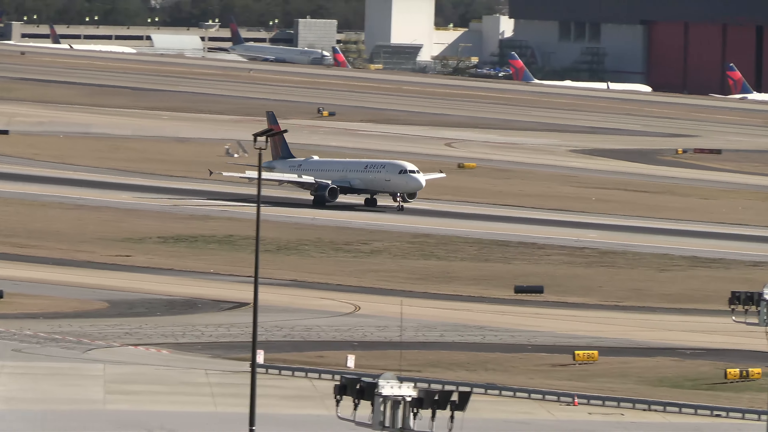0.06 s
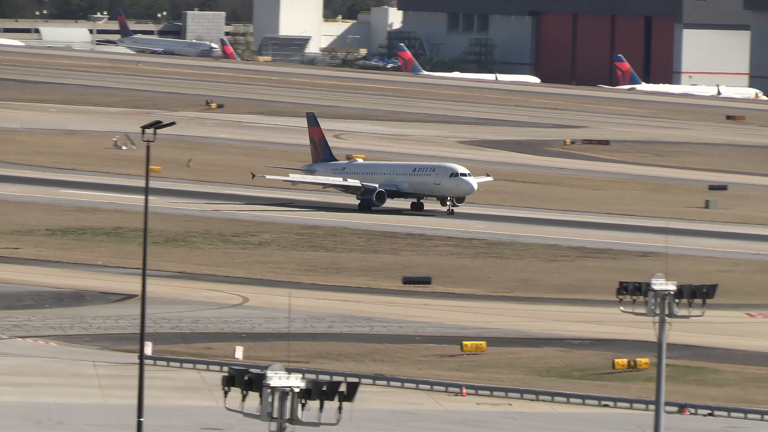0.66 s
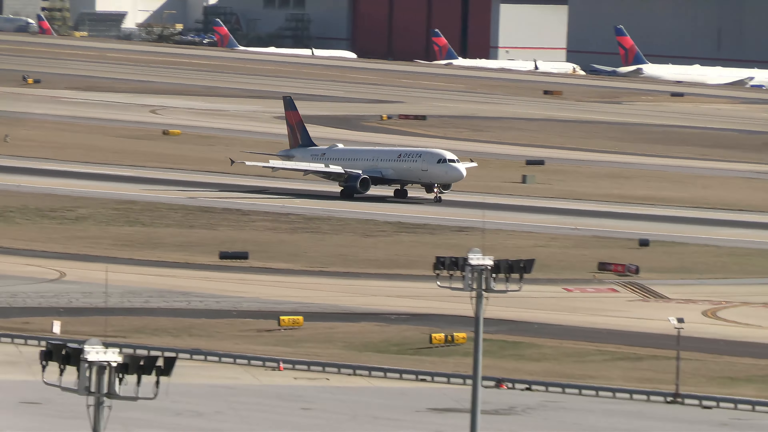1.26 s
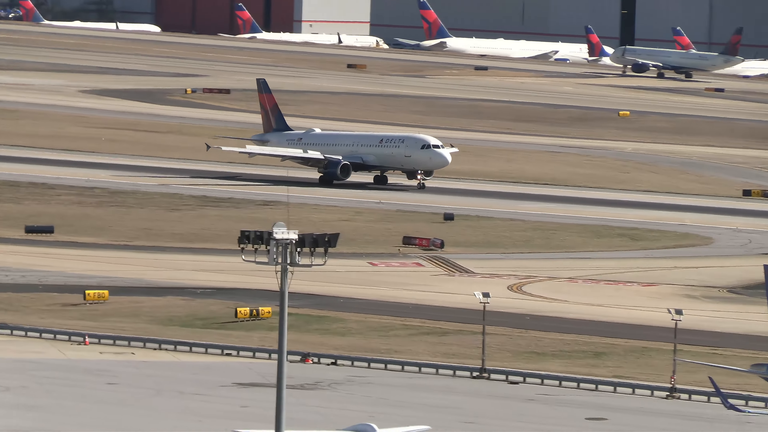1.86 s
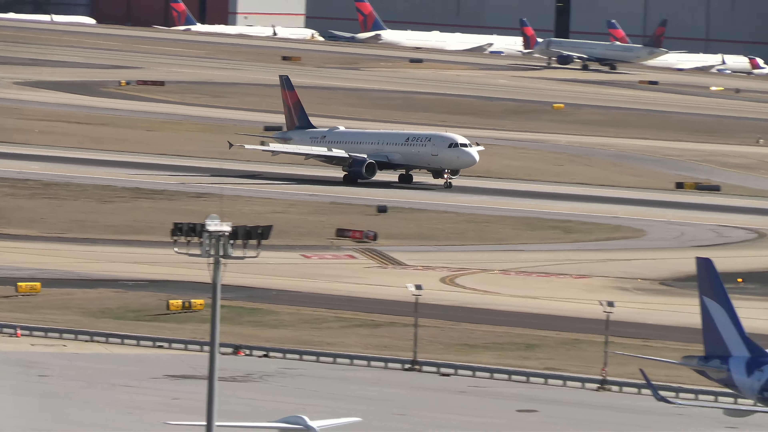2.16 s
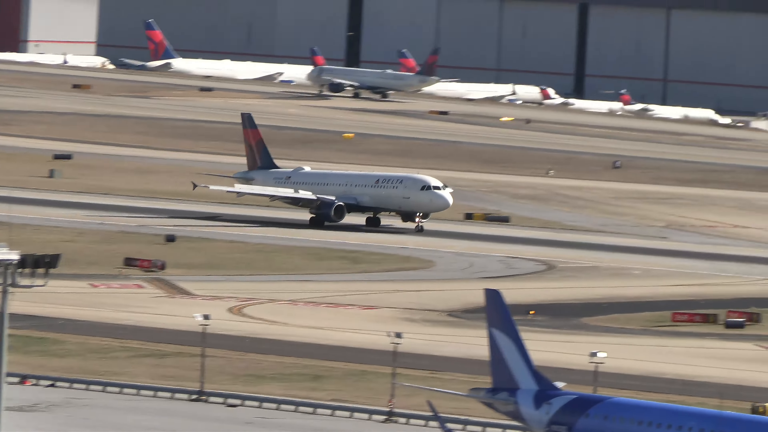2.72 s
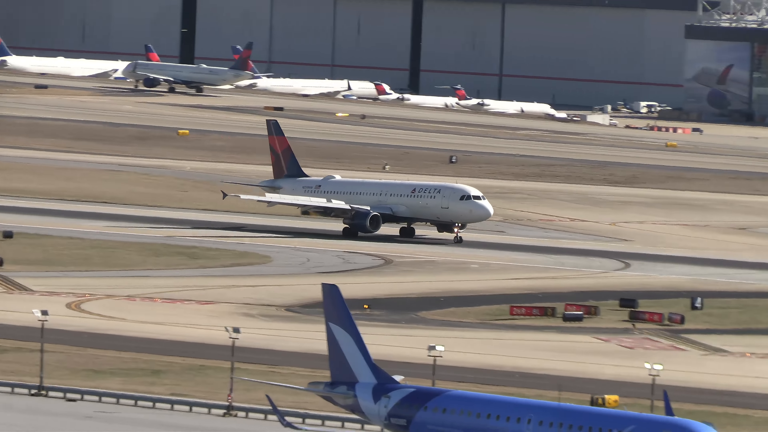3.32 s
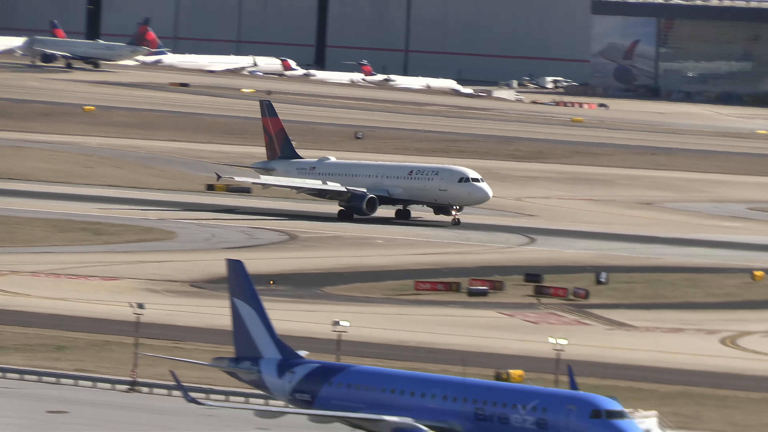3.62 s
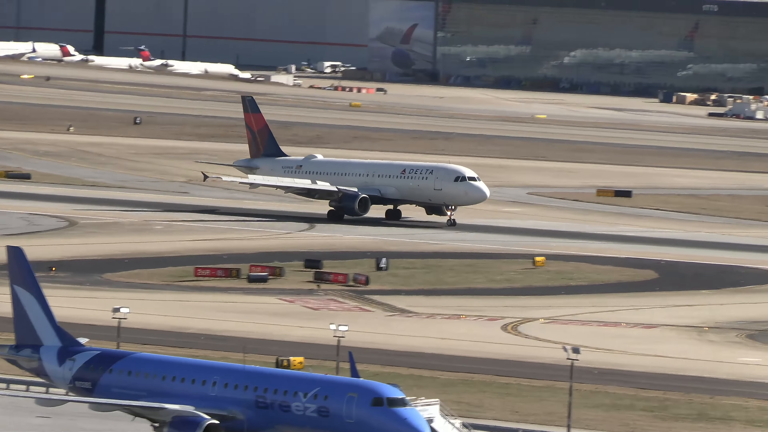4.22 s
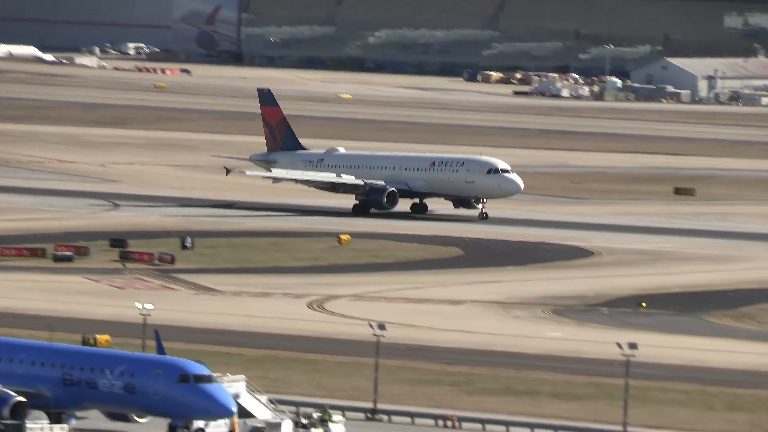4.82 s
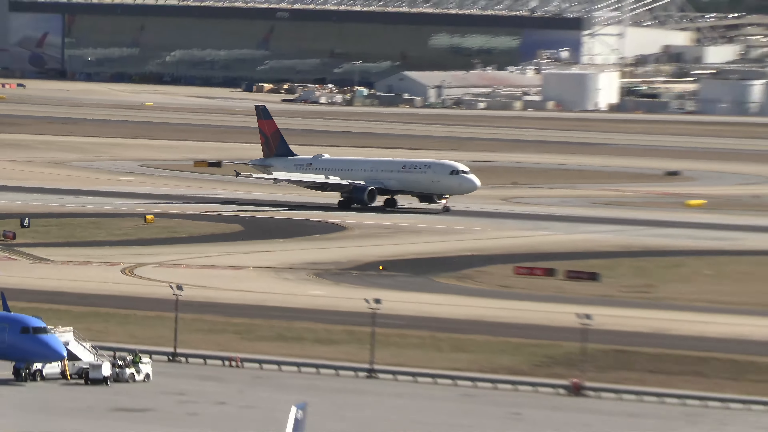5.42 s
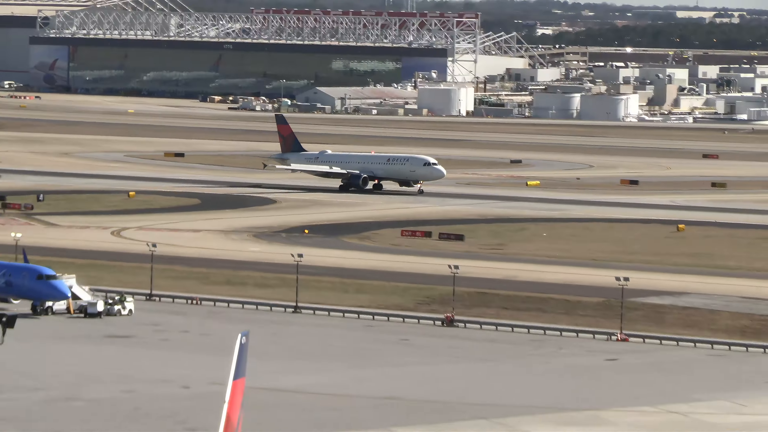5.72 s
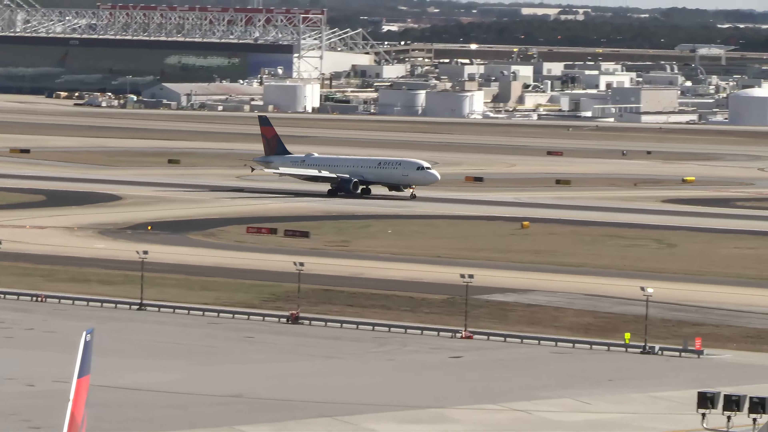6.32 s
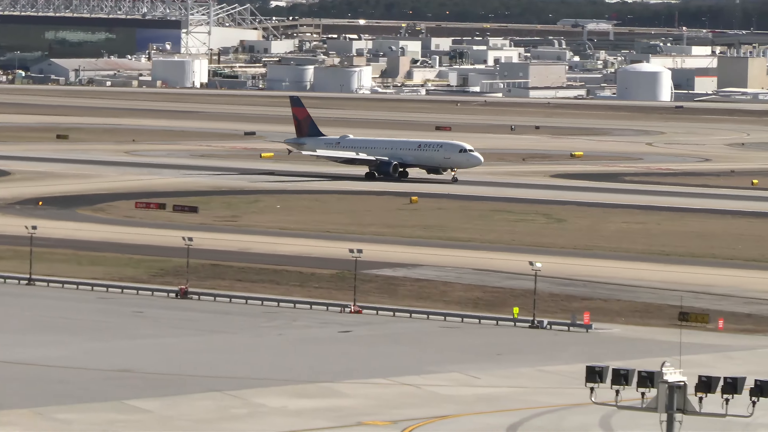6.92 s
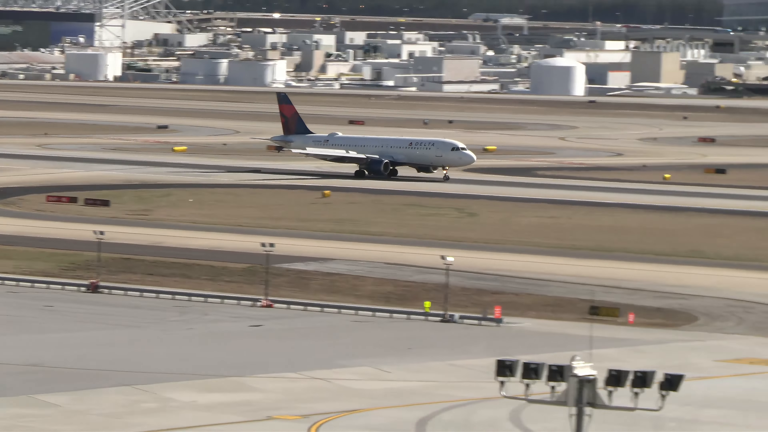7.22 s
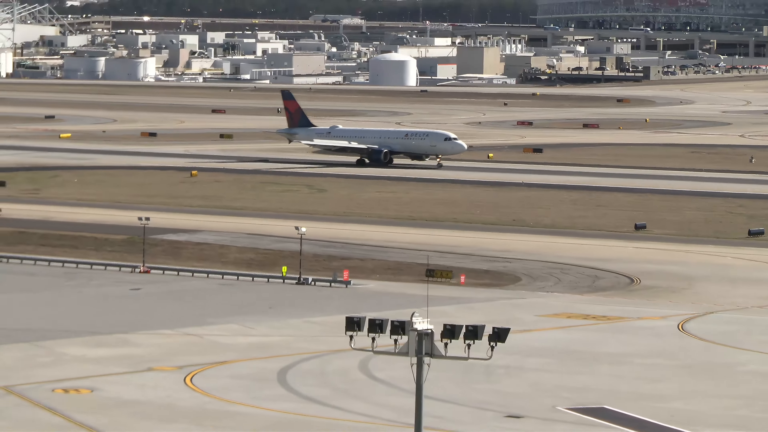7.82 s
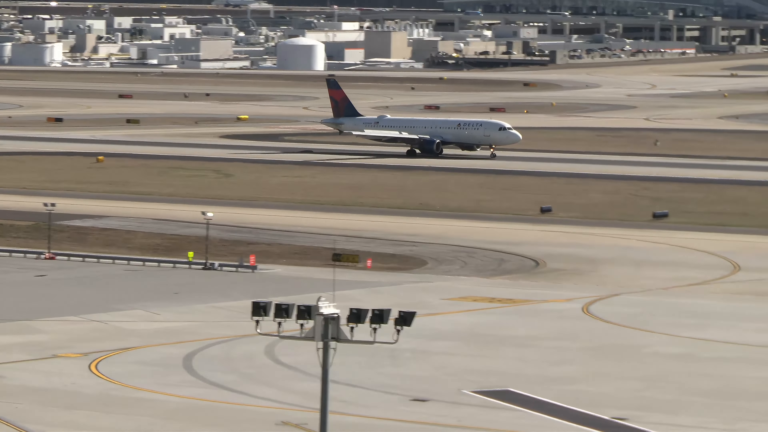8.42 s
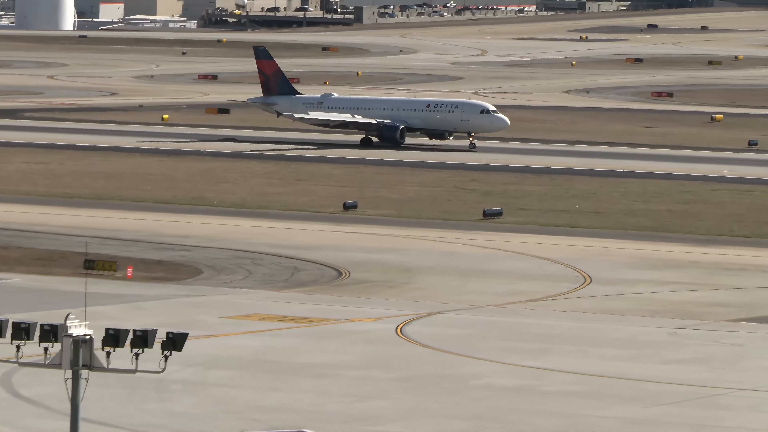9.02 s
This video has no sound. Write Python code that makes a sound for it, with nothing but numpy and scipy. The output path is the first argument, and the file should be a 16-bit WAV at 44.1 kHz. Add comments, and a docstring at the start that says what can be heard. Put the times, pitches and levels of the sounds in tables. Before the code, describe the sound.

Jet roar from an airliner on a far runway swells in uneven waves, with a low boom, hollow howls and a thin wavering whine.

```python
"""An airliner's jet roar, heard from a microphone pair far from the runway as the plane rolls out.
The exhaust noise swells and grows harsher in surges; a low boom, a drone and hollow howls stand out.
Surfaces near the microphones add short echoes whose delays slide as the plane passes: a slow phasing.
A thin fan whine spools up and sinks, over a faint hiss. At first boom and drone carry a pitched hum;
late on come a faint, low buffeting and one tiny tick of recorder distortion at a peak of the roar."""
import sys
import numpy as np
from scipy import signal
from scipy.fft import rfft, irfft, next_fast_len
from scipy.io import wavfile
from scipy.ndimage import uniform_filter1d, minimum_filter1d

SR = 44100
rng = np.random.default_rng(int(sys.argv[2]) if len(sys.argv) > 2 else 0)


def int16_out(signal):
    """Quantize to a 16-bit WAV file."""
    q = np.round(np.clip(np.atleast_2d(signal).T, -1, 1) * 32767)
    wavfile.write(sys.argv[1], SR, q.astype(np.int16))


N = 403956
FRAME, HOP = 4096, 1024
TIME = np.arange(N) / SR
FRAME_TIME = np.arange(N // HOP + 3)[:, None] * HOP / SR
BINS = np.fft.rfftfreq(FRAME, 1 / SR)


# jet mixing noise, before each band is brought to its level: frequency_hz, relative_db
JET_SPECTRUM = [(25, -51.5), (42, -41), (60, -23.5), (70, -27.5), (88, -11.5), (104, -12.5), (165, -4.5),
                (245, -5), (280, -6.5), (320, -4.5), (400, -4), (600, -6), (740, -13), (930, -16),
                (1070, -19.5), (1250, -19.5), (1600, -24), (2000, -28), (2200, -31), (2550, -36),
                (3000, -44.5), (4100, -62.5), (5500, -92)]
# the air takes less treble as the plane draws nearer: time_s, loss_db_per_khz
AIR_ABSORPTION = [(0, 6.5), (1.5, 7.5), (3, 2.5), (5, 2), (9.16, 2.5)]

def jet_roar():
    """Exhaust noise from the far runway, coloured by the air and by echoes, swelling in five bands."""
    air_db = -at_time(AIR_ABSORPTION, FRAME_TIME)[0] * np.minimum(BINS / 1000, 5)
    spectrum = amp(at_hz(JET_SPECTRUM, BINS) + air_db)
    noise = noise_at_microphones(spectrum * nearby_echoes() * roar_resonances() * turbulence())
    bands = split(noise, edges_hz=(110, 260, 800, 2600))
    windows = (12000, 7000, 7000, 9000, 9000)  # samples
    return sum(at_level(band, db, window) for band, db, window in zip(bands, roar_levels(), windows))


# the level between surges as the plane nears: time_s, rumble_db, roar_db, harsh_db, sizzle_db
APPROACH = [(0.0, -31, -29.5, -33.5, -60), (2.4, -26.5, -25.5, -31.5, -56.5), (4.4, -25, -20.5, -28, -56),
            (7.0, -20.5, -20, -27, -47.5), (9.16, -16.5, -18.0, -25.5, -43)]
# surges carried over by the air: crest_s, length_s, roar_db, harsh_db, sizzle_db
SURGES = [(1.55, 0.59, 1, 3, 1), (1.98, 0.44, 2, 3.5, 1), (2.751, 0.52, 5.5, 2.5, -0.5),
          (3.4, 0.58, 0.6, 3.5, 3), (4.01, 0.44, 2, 6.5, 6), (4.785, 0.38, 3.5, 4.5, 6.5),
          (5.22, 0.57, 2.5, 3.5, 2.5), (5.803, 0.51, 4.5, 1.5, -1.5), (6.442, 0.75, 3, 4, 2),
          (7.504, 0.54, 6.5, 5.5, 3), (8.35, 0.29, 3, 0, 1.5), (8.82, 0.093, 2.2, 2, -1)]
# brief gusts churning on top of the surges: crest_s, roar_db, treble_db
GUSTS = [(2.1, 2.5, -1.5), (2.32, 5, -0.5), (2.529, 1, 0), (2.69, 3, 0.5), (2.81, 2, 2), (3.72, 2, 1.5),
         (3.93, 1.5, 1.5), (4.12, 3, -1.5), (4.47, 2, 0.5), (4.72, 0, 0.5), (5.08, -0.5, 2),
         (5.16, 1.5, 1.5), (5.28, 1, 2), (5.36, 4, -0.5), (5.48, 3.5, -0.5), (5.83, 2.5, 2.5), (5.89, 0, 2),
         (6.33, 1, 0.5), (6.51, 0.5, 1), (6.57, 2.5, 0.5), (7.29, 3, -0.5), (7.35, -0.5, 1.8),
         (7.52, -0.5, 6), (7.64, 7.5, 6)]
# lulls, where part of the sound briefly sinks: deepest_s, length_s, rumble_db, roar_db, treble_db
LULLS = [(3.12, .2, -2.5, 0, -1), (4.31, 0.2, 0, -2.5, 0.5), (4.83, 0.077, 0, -3, -3.5),
         (5.55, 0.13, -0.5, 0, -1.5), (6.08, 0.056, 3.5, -5, -1), (6.47, 0.043, 4.5, -4, 0),
         (7.1, 0.19, -1.5, -2.5, 1), (7.8, 0.12, -1.5, 0.5, -1.5)]
# rolls of the rumble, apart from the surges: crest_s, length_s, lift_db
RUMBLE_ROLLS = [(2.07, 0.18, 4.5), (2.38, 0.19, 5.5), (2.89, 0.5, 7.5), (3.4, 0.46, 4), (3.74, 0.085, 8.5),
                (4.0, 0.31, 4), (4.59, 0.52, 5.5), (5.36, 0.85, 4), (6.85, 0.302, 3), (7.53, 0.91, 3),
                (8.14, 0.1, 6.5), (8.4, 0.21, 6.5), (8.91, 0.32, 2)]
# heaves of the deep bass: crest_s, length_s, lift_db
BASS_HEAVES = [(2.35, 0.5, 5.5), (4.35, 0.25, 4), (6.33, 0.2, 6), (6.85, 0.6, 4)]

def roar_levels(gust_s=0.054, deep_db=-37.5):
    """The dB reaching the microphones in the deep, rumble, roar, harsh and sizzle bands."""
    rumble_db, roar_db, harsh_db, sizzle_db = at_time(APPROACH, TIME)
    roar_surge, harsh_surge, sizzle_surge = lifts(SURGES)
    roar_gust, treble_gust = lifts([(crest_s, gust_s, *lift_db) for crest_s, *lift_db in GUSTS])
    rumble_lull, roar_lull, treble_lull = lifts(LULLS)
    shimmer_db = .5 * wander(rate_hz=22)  # the treble shimmers on its way through the air
    flutter_db = shimmer_db + treble_gust + treble_lull
    sway_db = 1.3 * wander(rate_hz=6.1)
    return (deep_db + lifts(BASS_HEAVES)[0] + sway_db,
            rumble_db + lifts(RUMBLE_ROLLS)[0] + rumble_lull,
            roar_db + roar_surge + roar_gust + roar_lull,
            harsh_db + harsh_surge + flutter_db,
            sizzle_db + sizzle_surge + flutter_db)


# moving peaks and dips in the roar, from low to high: time_s, pitch_hz, lift_db
BOOM = [(0, 151.4, 9), (1.8, 156.1, 7), (2.9, 159.9, 6.5), (4, 162, 2), (5.0, 184.5, 2), (5.6, 213, 12),
        (6.4, 190, 7.5), (7.4, 184.2, 6.5), (8.5, 178.7, 7.5), (9.16, 181, 5)]  # the centre of the rumble
TROUGH = [(0, 265, 1.5), (1.9, 255, -7), (2.8, 225, 0), (3.5, 235, 3.5), (4.3, 262, -0.5), (5.5, 266, 9.5),
          (6.5, 258, 0.5), (7.6, 250, -2), (9.16, 275, 1)]  # a dip near 260 Hz that turns into a peak around 5.5 s
DRONE = [(0, 339, 8), (.9, 337.5, 0.5), (1.4, 321.5, 10.5), (2.1, 335, 6.5), (2.9, 322.6, 10),
         (3.3, 311.5, 3.5), (4.4, 336, 0.5), (5, 431, 4), (6.3, 393.5, 6), (7.3, 361, 7.5), (9.16, 351, 1)]  # about an octave above the boom
LOW_HOWL = [(0, 435, -3), (2.7, 444, 5), (3.5, 441, 1), (4.6, 441, 9.5), (5.2, 508, 8), (6.5, 496, 4),
            (7.6, 494, 7), (8.1, 483, 1), (9.16, 443, -0.5)]
MIDDLE_HOWL = [(0, 542, -1), (2.8, 540, 6), (3.6, 527, 2), (4.1, 582, 5.5), (5.2, 650, 0.5),
               (6.5, 659, 4.5), (7.6, 623, 5.5), (8.1, 703, 3.5), (9.16, 721, 8.5)]
LOW_GAP = [(0, 627, 1), (1.7, 680, -0.5), (2.8, 723, -1), (4, 702, -0.5), (5.5, 736, -1), (6.6, 764, -2.5),
           (7.5, 780, -2), (9.16, 830, -1.5)]  # probably cut by the ground reflection
HIGH_HOWL = [(0, 755, -1.5), (1.8, 860, -1.5), (2.8, 875, 1.5), (3.6, 800, 5), (4.4, 842, 2.5),
             (5, 952, 5.5), (5.8, 880, -1.5), (6.5, 869, 6.5), (7.5, 930, 2), (9.16, 923, -3)]
THIN_HOWL = [(0, 1120, 3.5), (2, 1147, -1.5), (4.1, 1175, 7.5), (5, 1193, 0.5), (5.9, 1174, 7),
             (6.6, 1160, 1), (7.6, 1110, 1), (9.16, 1040, 2.5)]
HIGH_GAP = [(0, 1410, -2), (2.8, 1300, -0.5), (4.8, 1200, -2.5), (5.6, 1290, -0.5), (6.6, 1448, -5.5),
            (7.5, 1420, -1.5), (9.16, 1336, -0.5)]
BITE = [(0, 1810, -2), (1.5, 1800, -1), (1.9, 1800, -0.5), (2.75, 1740, 3.5), (3.1, 1800, -0.5),
        (5.1, 1770, 1.5), (7.45, 1700, 0.5), (7.75, 1700, -3), (8.4, 1700, 2), (9.16, 1720, -1.5)]  # the broad top of the roar

def roar_resonances():
    """Gain that makes boom, drone and hollow howls stand out, with gaps between them."""
    lows = resonance(BOOM, width_hz=25) * resonance(TROUGH, width_hz=17) * resonance(DRONE, width_hz=29)
    howls = resonance(LOW_HOWL, width_hz=41) * resonance(MIDDLE_HOWL, width_hz=42)
    upper_howls = resonance(HIGH_HOWL, width_hz=44) * resonance(THIN_HOWL, width_hz=55)
    gaps = resonance(LOW_GAP, width_hz=65) * resonance(HIGH_GAP, width_hz=80)
    return lows * howls * upper_howls * gaps * resonance(BITE, width_hz=700)


# reflections off three surfaces close to the microphones: time_s, delay_ms, strength_ratio
SHORT_ECHO = [(0, 2.57, 0.19), (2, 2.55, 0.06), (4, 2.09, 0.5), (5.5, 2, 0.4), (7.5, 1.75, 0.35),
              (9.16, 1.49, 0.48)]
MIDDLE_ECHO = [(0, 5.6, 0.088), (2, 6.2, 0.12), (4, 5.0, 0.11), (5.5, 5.86, 0.12), (7.5, 6.4, 0.4),
               (9.16, 6.73, 0.66)]
LONG_ECHO = [(0, 10.4, 0.015), (4, 6.8, 0.025), (5.5, 7.4, 0.25), (7.5, 8.05, 0.36), (9.16, 8.95, 0.33)]

def nearby_echoes():
    """Comb gain of the direct sound plus sliding echoes; each surface returns less of the treble."""
    response = 1
    for rows, dull_hz in ((SHORT_ECHO, 1110), (MIDDLE_ECHO, 746), (LONG_ECHO, 1150)):
        delay_ms, strength = at_time(rows, FRAME_TIME)
        delayed = np.exp(-2j * np.pi * BINS * delay_ms / 1000)
        response = response + strength * delayed / (1 + (BINS / dull_hz) ** 2)
    return abs(response)


def turbulence(depth_db=2.0):
    """Moving air between runway and microphones focuses and scatters patches of the spectrum."""
    patches = rng.standard_normal((len(FRAME_TIME), len(BINS)))
    patches = uniform_filter1d(patches, size=14, axis=0)
    patches = uniform_filter1d(patches, size=3, axis=1)
    return amp(depth_db * unit(patches))


# the fan's blade tone idles, spools up, then sinks with the Doppler shift: time_s, pitch_hz
BLADE_TONE = [(0, 2060), (.9, 2025), (1.5, 1945), (2.05, 1980), (2.3, 2096), (2.85, 2505), (3.1, 2527),
              (3.9, 2480), (4.8, 2497), (5.8, 2458), (6.5, 2404), (7.85, 2430), (8.2, 2392), (9.16, 2405)]
# the air focuses the whine into brief flares: crest_s, length_s, lift_db
WHINE_FLARES = [(2.42, .3, 3), (3.05, .3, 1), (3.38, 0.13, 3), (3.94, 0.24, 7), (4.43, .16, 4),
                (5.08, .16, 8), (5.82, .13, 9), (6.4, 0.24, 2), (7.27, 0.28, 5), (7.9, 0.3, 8.5),
                (8.22, .3, 5), (8.6, 0.47, 6.5)]

def fan_whine(base_db=-58, growth_db_per_s=1.0, waver_hz=8, fading_db=2.5, swing_db=1.5, lean_db=3.0):
    """The blade tones of two distant engines; the air blurs them and makes them fade in and out."""
    pitch_hz = at_time(BLADE_TONE, TIME)[0]
    engines = []
    for _ in range(2):
        cycles = np.cumsum(pitch_hz + waver_hz * wander(rate_hz=38)) / SR
        engines.append(np.sin(2 * np.pi * cycles) * amp(fading_db * wander(rate_hz=38)))
    left = (engines[0] + engines[1]) * amp(lean_db)
    right = (engines[0] + 0.45 * engines[1]) * amp(-lean_db)
    surge_db = 0.96 * lifts(SURGES)[1]  # rides with the roar's harsh band
    level_db = base_db + growth_db_per_s * TIME + surge_db + lifts(WHINE_FLARES)[0]
    return at_level(np.array([left, right]), level_db + swing_db * wander(rate_hz=2.7))


def hum(wobble_hz=4.48, fading_db=3, drone_db=-7, end_s=3.15, fade_s=.08):
    """The pitched cores of boom and drone; they roll with the rumble and fade as the roar fills out."""
    tones = []
    for rows in (BOOM, DRONE):
        cycles = np.cumsum(at_time(rows, TIME)[0] + wobble_hz * wander(rate_hz=16)) / SR
        tones.append(unit(np.sin(2 * np.pi * cycles) * amp(fading_db * wander(rate_hz=16))))
    boom, drone = tones
    level_db = at_time(APPROACH, TIME)[0] + lifts(RUMBLE_ROLLS)[0] - 6.5  # just under the rumble
    fade = .5 - .5 * np.tanh((TIME - end_s) / fade_s)
    return (boom + amp(drone_db) * drone) * amp(level_db) * fade


# thin background hiss: frequency_hz, relative_db
HISS_SPECTRUM = [(1500, -3), (3000, 8.5), (3600, 0), (4500, -2.5), (5500, -7), (8000, -12.5),
                 (11000, -16.5), (14000, -26.5)]
# a soft crest drifting through it: time_s, pitch_hz, lift_db
HISS_CREST = [(0, 4200, 2), (0.8, 4550, 3.5), (1.3, 4070, 1), (2.6, 4300, -2), (3.6, 5300, 2.5),
              (9.16, 5240, 3)]

def hiss(top_db=-66.5, hold_s=1.3, fade_db_per_s=2.5, dulling_db_per_khz_s=0.6):
    """A faint hiss behind the roar; it holds, then recedes and dulls, and dips under each surge."""
    receding_s = np.maximum(FRAME_TIME - hold_s, 0)
    dull_db = -dulling_db_per_khz_s * receding_s * np.maximum(BINS / 1000 - 6, 0)  # above 6 kHz
    spectrum = amp(at_hz(HISS_SPECTRUM, BINS) + dull_db)
    noise = noise_at_microphones(spectrum * resonance(HISS_CREST, width_hz=600))
    top = split(noise, edges_hz=(4400,))[1]  # this band sets the level
    dip_db = 0.47 * lifts(SURGES)[0]
    level_db = top_db - fade_db_per_s * np.maximum(TIME - hold_s, 0) - dip_db
    return noise / top.mean(0).std() * amp(level_db)


def buffet(level_db=-44):
    """A brief, faint buffeting far below the rumble, the same in both microphones."""
    return wander(rate_hz=49) * amp(level_db) * swell(TIME, crest_s=7.3, length_s=.9)


def tick(start_s=8.443, level_db=-59, decay_s=0.0045, pitch_hz=6300, width_hz=1500):
    """One tiny, bright tick of recorder distortion, placed at a peak of the roar."""
    hz = np.fft.rfftfreq(N, 1 / SR)
    band = np.exp(-((hz - pitch_hz) / width_hz) ** 2 / 2)
    noise = unit(irfft(rfft(rng.standard_normal(N)) * band, N))
    age = TIME - start_s
    return noise * amp(level_db) * (age > 0) * np.exp(-abs(age) / decay_s)


# how alike the two microphones sound: frequency_hz, coherence_ratio
MIC_COHERENCE = [(60, 1), (200, 1), (280, 0.89), (500, 1), (650, 0.97), (770, 0.72), (900, 0.85),
                 (1220, 0.78), (1500, 0.67), (1800, .77), (2400, 0.46), (3300, 0.73), (4200, 0.25),
                 (9000, 0.8)]
# how much louder the left microphone is: frequency_hz, left_minus_right_db
MIC_BALANCE = [(60, 1.9), (230, 1.3), (350, 4.6), (550, 1.6), (700, 1.3), (820, 2.6), (1080, 1.7),
               (1300, .5), (1530, 6.6), (1850, 1.7), (2750, 3.5), (3700, 3), (6000, .3)]
# how far the left microphone leads in phase: frequency_hz, lead_rad
MIC_PHASE = [(60, -0.29), (450, -0.1), (760, 0.51), (900, -0.34), (1150, -0.5), (1550, -0.68), (2100, 0.36),
             (2650, 0.94), (2900, 0.97), (3600, -.1)]

def noise_at_microphones(gain):
    """Noise with the given gain over frames and bins, as the microphone pair picks it up."""
    a, b, c, d = rng.standard_normal((4, len(FRAME_TIME), len(BINS)))
    left, unrelated = a + 1j * b, c + 1j * d
    alike = at_hz(MIC_COHERENCE, BINS)
    lag = np.exp(-1j * at_hz(MIC_PHASE, BINS))
    right = (alike * left + np.sqrt(1 - alike ** 2) * unrelated) * lag
    lean = amp(at_hz(MIC_BALANCE, BINS) / 2)
    spectra = np.array([left * lean, right / lean]) * gain
    return signal.istft(spectra, nperseg=FRAME, noverlap=FRAME - HOP, time_axis=1, freq_axis=2)[1][:, :N]


def resonance(rows, width_hz):
    """Gain of one moving peak or dip in the spectrum."""
    pitch_hz, lift_db = at_time(rows, FRAME_TIME)
    return amp(lift_db / (1 + (2 * (BINS - pitch_hz) / width_hz) ** 2))


def swell(t, crest_s, length_s, squareness=3.7):
    """Rises from 0 to 1 and falls back; squareness above 2 steepens the sides and flattens the crest."""
    return np.exp(-abs(2 * (t - crest_s) / length_s) ** squareness)


def lifts(rows):
    """The dB that a table of swells adds over time: one curve for each dB column."""
    t = FRAME_TIME[:, 0]
    curves = sum(np.outer(lift_db, swell(t, crest_s, length_s)) for crest_s, length_s, *lift_db in rows)
    return [np.interp(TIME, t, curve) for curve in curves]


def wander(rate_hz):
    """Smooth random motion of rms 1, up to about rate_hz."""
    length = next_fast_len(N)
    lowpass = np.exp(-(np.fft.rfftfreq(length, 1 / SR) / rate_hz) ** 2)
    return unit(irfft(rfft(rng.standard_normal(N), length) * lowpass, length)[:N])


def split(pair, edges_hz):
    """Cuts a sound into neighbouring bands that sum to the whole."""
    length = next_fast_len(N)
    hz, spectrum = np.fft.rfftfreq(length, 1 / SR), rfft(pair, length)
    below = [0] + [1 / (1 + (hz / edge) ** 12) for edge in edges_hz] + [1]
    return [irfft(spectrum * (hi - lo), length)[:, :N] for lo, hi in zip(below, below[1:])]


def at_level(pair, db, window=9000):
    """Makes a stereo sound follow a level curve, keeping flutter shorter than the window of samples."""
    power = uniform_filter1d(uniform_filter1d(pair.mean(0) ** 2, window), window)
    return pair * amp(db) / np.sqrt(abs(power) + 1e-20)


def at_time(rows, t):
    """Every column of a curve table at the times t."""
    time_s, *columns = np.transpose(rows)
    return [np.interp(t, time_s, column) for column in columns]


def at_hz(rows, hz):
    """A spectrum table read on a log-frequency axis."""
    frequency_hz, value = np.transpose(rows)
    return np.interp(np.log(hz + 1), np.log(frequency_hz + 1), value)


def amp(db):
    """Decibels to gain."""
    return 10 ** (np.asarray(db) / 20)


def unit(x):
    """Scales to rms 1."""
    return x / np.sqrt(np.mean(x ** 2) + 1e-20)


# the plane drifts across the microphone pair: time_s, left_minus_right_db
BEARING = [(0, 0), (2.7, 0), (3.6, -0.5), (6, -0.26), (8.3, 0.8), (9.16, 0.6)]

def scene():
    """Roar and whine drift a little right, then left, over hum, hiss, buffeting and a tick."""
    pan = amp(at_time(BEARING, TIME)[0] * np.array([[.5], [-.5]]))
    return (jet_roar() + fan_whine()) * pan + hum() + hiss() + buffet() + tick()


def record(dry):
    """The recorder's smooth peak limiter and band limit."""
    ceiling, cutoff_hz = .87, 14600
    allowed = ceiling / np.maximum(abs(dry).max(0), ceiling)
    held = minimum_filter1d(allowed, size=600)
    gain = uniform_filter1d(uniform_filter1d(held, size=300), size=300)
    lowpass = signal.firwin(511, cutoff_hz, window=("kaiser", 9), fs=SR)
    return signal.oaconvolve(dry * gain, lowpass[None], "same")


dry = scene()
out = record(dry)
int16_out(out)
```